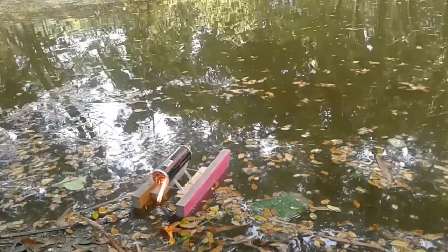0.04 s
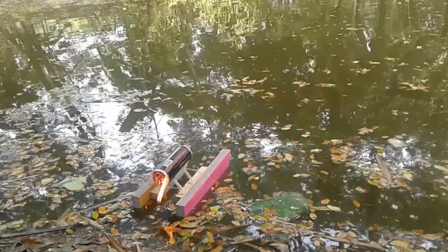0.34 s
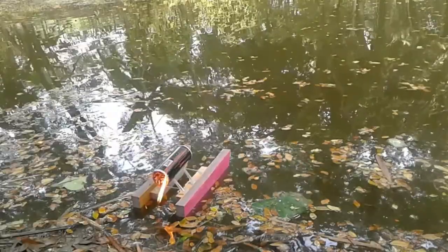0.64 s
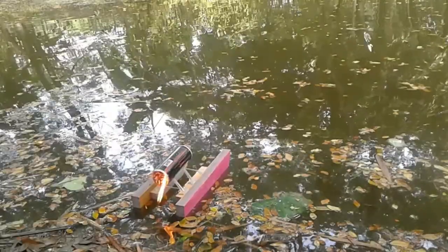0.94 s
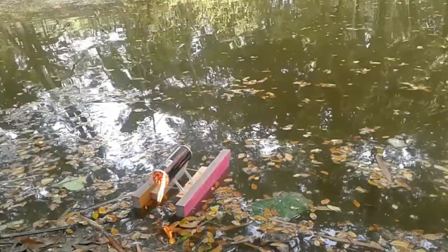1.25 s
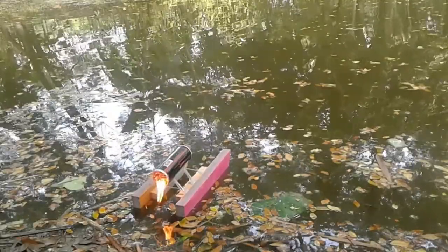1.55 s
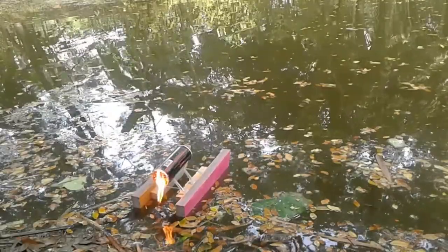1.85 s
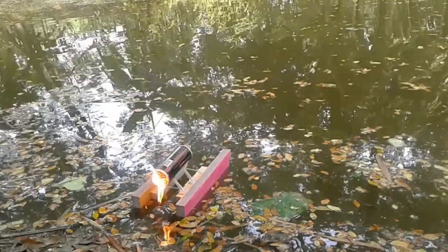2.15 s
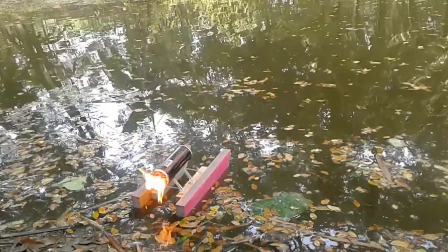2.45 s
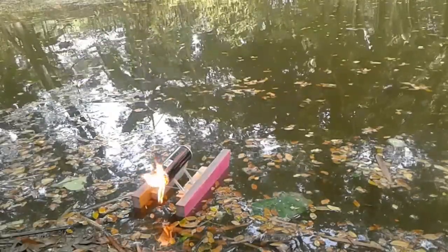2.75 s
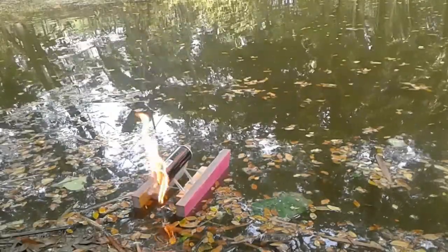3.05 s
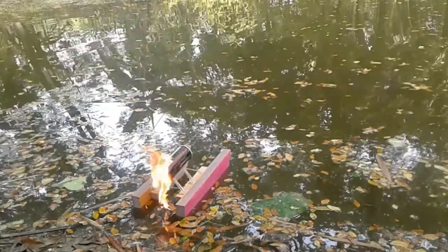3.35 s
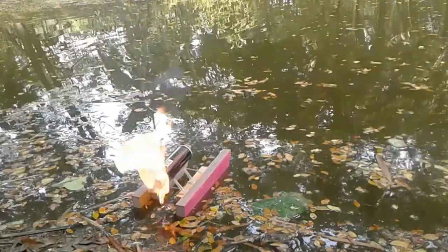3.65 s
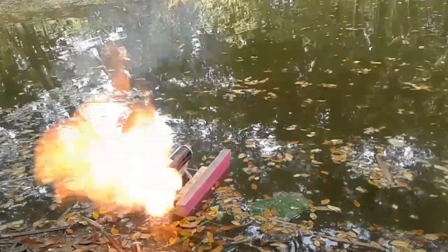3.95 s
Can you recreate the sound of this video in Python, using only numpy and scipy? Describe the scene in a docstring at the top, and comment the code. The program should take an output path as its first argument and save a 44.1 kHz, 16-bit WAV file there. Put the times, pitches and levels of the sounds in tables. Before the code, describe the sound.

Matches burning in a metal tube pop and hiss, then flare into a roaring jet.

```python
"""Beside a pond, with the microphone facing a metal tube in which match heads burn. The flame flutters,
spits and pops; gas rushes from the mouth in surges, hisses harder and at last flares into a roaring jet.
A small piece of metal clinks at first. Far off a bird whistles and trills in the trees, which echo it,
over a low murmur of open air. Everything sits in the middle, with only a slight stereo width."""
import sys
import numpy as np
from scipy import signal
from scipy.fft import rfft, irfft
from scipy.io import wavfile
from scipy.ndimage import uniform_filter1d

SR = 44100
rng = np.random.default_rng(int(sys.argv[2]) if len(sys.argv) > 2 else 0)


def log_audio(samples):
    """Write samples as a 16-bit WAV file to the path given in sys.argv[1]."""
    # one column per channel
    frames = np.atleast_2d(samples).T
    # limit to full scale, then quantise
    limited = np.clip(frames, -1, 1)
    pcm = np.round(limited * 32767).astype(np.int16)
    wavfile.write(sys.argv[1], SR, pcm)


N = 176400
TIME = np.arange(N) / SR

# gas at the tube's mouth: its surging rush, the flare's roar, the rumble below (time [s], level [dB])
RUSH_LEVEL = [(0, -70), (.2, -60), (.33, -77), (.44, -66.5), (.7, -65), (.78, -61.5), (1.1, -63.5),
              (1.3, -72), (1.35, -53), (1.55, -54.5), (1.72, -62.5), (2.02, -59.5), (2.06, -52),
              (2.35, -50.5), (2.6, -52), (2.84, -46), (3.05, -51), (3.25, -47.5), (3.4, -47.5),
              (3.55, -42.5), (3.75, -40), (4, -33)]
ROAR_LEVEL = [(0, -100), (3.0, -62), (3.18, -60), (3.23, -49), (3.38, -53), (3.5, -40), (3.6, -42),
              (3.72, -34), (3.83, -33), (4, -31.5)]
RUMBLE_LEVEL = [(0, -100), (3.3, -55), (3.6, -57), (3.8, -47), (3.82, -29.5), (3.9, -36.5), (3.96, -29),
                (4, -37)]
# the colour of each (frequency [Hz], relative level [dB])
RUSH_SPECTRUM = [(40, -29), (150, -3.5), (400, 1), (1000, 1), (1500, -2), (2200, -24.5), (3400, -13),
                 (5000, -14), (7200, -23), (8500, -30), (11500, -25.5), (14000, -24.5), (16000, -24)]
ROAR_SPECTRUM = [(60, -20), (210, -7), (450, 4), (680, -2), (1100, 0), (1550, 0.5), (1860, -7),
                 (2120, -1.5), (2400, -4.5), (2780, 2.5), (3200, -6.5), (3700, -6.5), (4400, -19.5),
                 (7000, -14), (9500, -30), (13700, -19), (16000, -19)]
RUMBLE_SPECTRUM = [(20, -32), (45, -19), (80, -2.5), (120, 0), (205, 5), (330, -4.5), (600, -11.5),
                   (2000, -21), (16000, -80)]
def jet(rush_flutter_db, roar_flutter_db, rumble_flutter_db):
    """Turbulent gas leaves the tube: a fluttering rush, then the roar and rumble of the open flare."""
    rush = noise(RUSH_SPECTRUM) * undb(curve(RUSH_LEVEL) + rush_flutter_db * wander(rate_hz=64))
    eddies = wander(rate_hz=54)
    roar = noise(ROAR_SPECTRUM) * undb(curve(ROAR_LEVEL) + roar_flutter_db * eddies)
    rumble = noise(RUMBLE_SPECTRUM) * undb(curve(RUMBLE_LEVEL) + rumble_flutter_db * eddies)
    return rush + roar + rumble


# hiss of the jet (time [s], level [dB])
HISS_LEVEL = [(0, -77), (2.02, -77), (2.3, -60.5), (2.6, -55.5), (2.81, -47.5), (3.05, -54.5),
              (3.25, -50.5), (3.39, -48.5), (3.5, -42.5), (3.7, -43), (3.8, -44), (3.87, -39.5), (4, -55)]
# its resonances (frequency [Hz], relative level [dB]) and their drift (time [s], pitch [ratio])
HISS_SPECTRUM = [(1000, -8.5), (2300, -3), (2700, 1.5), (3150, -0.5), (3750, 5.5), (4400, 0.5), (5000, 0.5),
                 (6100, -15), (7000, 1), (7650, 0.5), (8550, -9), (9100, -5.5), (9750, -18), (11050, -9.5),
                 (11750, -14), (12900, -2.5), (13800, -11), (14500, -20), (16000, -17)]
HISS_DRIFT = [(2.2, 1.08), (2.8, 1.01), (3.3, 1), (3.72, .985), (3.8, .9), (3.87, .98)]
def hiss(flutter_db, patch_db=2, patch_hz=500, patch_s=.06):
    """Gas hisses in broad resonances that swell and fade in patches, and sink as the flame leaves."""
    hz, t, bins = signal.stft(rng.standard_normal(N), SR, nperseg=512)
    patches = uniform_filter1d(rng.standard_normal(bins.shape), size=int(patch_hz / hz[1]), axis=0)
    patches = unit(uniform_filter1d(patches, size=int(patch_s / t[1]), axis=1))
    gain = response(HISS_SPECTRUM, hz[:, None] / curve(HISS_DRIFT, t)) * undb(patch_db * patches)
    gas = signal.istft(bins * gain, SR)[1][:N]
    return unit(gas) * undb(curve(HISS_LEVEL) + flutter_db * wander(rate_hz=20.5))


# a hollow in the jet's treble as the flame shoots out (time [s], centre [Hz], depth [dB])
TREBLE_HOLLOW = [(3.45, 6100, 0), (3.68, 5800, 5), (3.76, 5400, 8), (3.815, 4350, 11), (3.87, 4900, 3),
                 (3.95, 4900, 8), (4, 4700, 6)]
def whoosh(gas, width_octaves=.14):
    """A sliding dip in the treble gives the flare its falling whoosh."""
    hz, t, bins = signal.stft(gas, SR, nperseg=512)
    off_centre = np.log2((hz[:, None] + 1) / curve(TREBLE_HOLLOW, t)) / width_octaves
    dip_db = curve(TREBLE_HOLLOW, t, column=2) * np.exp(-off_centre ** 2)
    return signal.istft(bins * undb(-dip_db), SR)[1][:N]


# pops in the tube (time [s], pitch [Hz], level [dB], rattle relative to the pop [dB])
GAS_POPS = [(.136, 1290, -39, -9.5), (0.2795, 1190, -24.5, -18), (0.2988, 900, -39, -25),
            (.641, 2580, -46, -9.5), (0.8794, 980, -25, -16.5), (0.94, 2630, -39.5, -9.5),
            (1.002, 1500, -48.5, -3.5), (1.109, 1690, -44.5, -4), (1.152, 1850, -43.5, -11),
            (1.361, 1220, -33.5, -12), (1.563, 910, -33, -23), (1.781, 2240, -41, -10),
            (1.8, 523.4, -41, -4), (1.933, 2570, -41.5, -14), (1.957, 1600, -46, -13),
            (2.889, 464, -29, -13)]
def pops(lead_s=.005):
    """The larger pockets of gas burst one by one."""
    out = np.zeros(N)
    for start, hz, db, rattle_db in GAS_POPS:
        add(out, start - lead_s, undb(db) * burst(hz, rattle_db, rng.standard_normal(SR // 12), lead_s))
    return out


def burst(hz, rattle_db, white, lead_s=.005, rattle_decay_s=.0079):
    """A pocket of gas bursts: a pressure swing with a slower body and a sharper edge, then a rattle."""
    t = TIME[:len(white)] - lead_s
    phase = np.pi * hz * t
    slow, fast = .35 * phase, 3.3 * phase
    swing = (1 - 2 * phase ** 2) * np.exp(-phase ** 2)
    body = undb(-15.5) * (1 - 2 * slow ** 2) * np.exp(-slow ** 2)
    edge = undb(-11) * 2 * fast * np.exp(-fast ** 2)
    band = signal.butter(1, [hz / 2, min(hz * 1.32, SR * .45)], "band", fs=SR)
    rattle = unit(signal.lfilter(*band, signal.lfilter(*band, white)))
    rattle *= (t > 0) * np.exp(-np.abs(t) / rattle_decay_s)
    return swing + body + edge + undb(rattle_db) * rattle


# match heads catching (time [s], length [s], level [dB], tilt [dB per octave])
MATCH_SPITS = [(0.191, 0.16, -58, -0.2), (0.344, 0.044, -52.5, 2.5), (0.733, 0.079, -58, 3),
               (0.833, 0.018, -54.5, -0.5), (1.052, .007, -60, 12), (1.187, .012, -62, 2),
               (1.32, 0.02, -53.5, -1.5), (1.88, 0.012, -49, -2.3), (2.035, 0.019, -51, -3),
               (3.422, 0.015, -45.5, 5), (3.919, 0.016, -35, 9.5), (3.962, .014, -41, 8)]
# their colour before the tilt (frequency [Hz], relative level [dB])
SPIT_SPECTRUM = [(200, 7), (1500, 11), (3000, 7), (5500, -5.5), (7200, 5.5), (9000, -12), (13000, -5.5),
                 (16000, -11)]
def spits(grain_db, attack_s=.009, release_s=.009):
    """Each match head catches with a short, grainy fizz, some dull and some bright."""
    out = np.zeros(N)
    for start, length, db, tilt in MATCH_SPITS:
        age = TIME - start
        envelope = np.clip(age / attack_s, 0, 1) * np.exp(-np.maximum(age - length, 0) / release_s)
        fizz = noise([(hz, level + tilt * np.log2(hz)) for hz, level in SPIT_SPECTRUM])
        out += undb(db) * envelope * fizz
    return out * undb(grain_db * wander(rate_hz=250))


# fine crackle of the flame (time [s], rate [bursts per second])
CRACKLE_DENSITY = [(0, 70), (.3, 165), (.5, 25), (.75, 80.5), (1.1, 179), (1.4, 50), (1.7, 28), (1.9, 69),
                   (2.2, 30.8), (4, 67)]
def crackle(level_db=-52.5, spread_db=1, centre_hz=1800, spread_octaves=.68):
    """Many tiny bursts at random moments, each of its own pitch and size."""
    out = np.zeros(N)
    expected_count = np.cumsum(curve(CRACKLE_DENSITY)) / SR
    draws = rng.standard_normal(size=(600, 2000))
    thresholds = np.cumsum(rng.exponential(size=len(draws)))
    for threshold, white in zip(thresholds[thresholds < expected_count[-1]], draws):
        start = np.interp(threshold, expected_count, TIME)
        hz = min(centre_hz * 2 ** (spread_octaves * white[0]), 3600)
        db = level_db + spread_db * min(white[1], 2)
        add(out, start, undb(db) * burst(hz, rattle_db=-8.5, white=white))
    return out


# touches of a small piece of metal (time [s], level [dB])
METAL_TOUCHES = [(.049, -46.5), (0.151, -45.5), (0.168, -48), (.222, -41.5), (.24, -42), (.317, -46.5),
                 (.466, -53), (.528, -44.5), (0.682, -42.5), (.723, -50), (0.782, -43.5)]
# its modes (frequency [Hz], relative level [dB], time to fall 60 dB [s])
METAL_MODES = [(3917, 1, 0.058), (3980, -17.5, .25), (10060, -33, 0.14), (14100, -33, .2)]
def clinks(attack_s=.001, bounce_s=.0063):
    """A small piece of metal touches, bounces once and rings out into the trees."""
    out, t = np.zeros(N), TIME[:SR // 2]
    for start, db in METAL_TOUCHES:
        *phases, bounce = rng.random(len(METAL_MODES) + 1)
        ring = sum(undb(level - 60 * t / t60) * np.sin(2 * np.pi * (hz * t + phase))
                   for (hz, level, t60), phase in zip(METAL_MODES, phases))
        ring *= undb(db) * np.minimum(t / attack_s, 1)
        add(out, start, ring)
        add(out, start + bounce_s * (.5 + bounce), ring)
    return trees(out, t60_s=.44, direct_db=0, tail_db=-7)


# arched whistles, far off in the trees (time [s], top pitch [Hz], level [dB])
BIRD_WHISTLES = [(.9, 6050, -48.5), (1.416, 6220, -45.5), (2.638, 6250, -43)]
# the shape of each (position [share of length], pitch [ratio], relative level [dB])
WHISTLE_ARCH = [(0, .92, -12), (.17, .985, -7), (.42, 1, -6), (.55, .945, -8), (.7, .78, -7.5),
                (1, .68, -7.5)]
# onsets of the trill's upward flicks (time [s])
FLICK_TIMES = [2.222, 2.255, 2.294, 2.33, 2.364, 2.396, 2.427, 2.464, 2.486, 2.522, 2.556]
# how the flicks narrow along the trill, and one longer rising note near its end
# (time [s], length [s], start pitch [Hz], end pitch [Hz], level [dB])
FLICK_SHAPES = [(2.222, .016, 5340, 6900, -54), (2.28, 0.023, 5117, 7040, -52),
                (2.4, 0.017, 5860, 6270, -51.5), (2.556, 0.017, 5840, 6200, -56.5)]
RISING_NOTE = (2.5, .058, 4996, 5330, -53)
def bird(waver=.008, fall_waver=.13, echo_s=.062, echo_db=-5.5):
    """A far bird trills and whistles, buzzy as the pitch falls. Trees blur it; the far bank echoes it."""
    song = np.zeros(N)
    whistle_s = .11
    share = np.linspace(0, 1, int(whistle_s * SR))
    buzz = waver + fall_waver * (1 - curve(WHISTLE_ARCH, share))
    for start, hz, db in BIRD_WHISTLES:
        whistle = note(whistle_s, [(position, hz * ratio) for position, ratio, _ in WHISTLE_ARCH], buzz)
        add(song, start, whistle * undb(db + curve(WHISTLE_ARCH, share, column=2)))
    flicks = [(start, *(curve(FLICK_SHAPES, start, k) for k in range(1, 5))) for start in FLICK_TIMES]
    for start, length, from_hz, to_hz, db in [RISING_NOTE, *flicks]:
        add(song, start, undb(db) * note(length, [(0, from_hz), (1, to_hz)], waver))
    echo = undb(echo_db) * np.interp(TIME - echo_s, TIME, song, left=0)
    return trees(song + echo, t60_s=.56, direct_db=-4, tail_db=.5)


def note(length_s, pitch, waver):
    """A wavering bird note with soft ends that follows (position [share of length], pitch [Hz])."""
    share = np.linspace(0, 1, int(length_s * SR))
    jitter = unit(uniform_filter1d(rng.standard_normal(SR), size=60))[:len(share)]
    hz = curve(pitch, share) * (1 + waver * jitter)
    return np.sin(2 * np.pi * np.cumsum(hz) / SR) * signal.windows.tukey(len(share), .5)


def trees(x, t60_s, direct_db, tail_db, build_s=.0047):
    """Trunks scatter a sound into a tail on its way to the microphone."""
    t = TIME[:SR]
    tail = rng.standard_normal(SR) * undb(-60 * t / t60_s) * (1 - np.exp(-t / build_s))
    scattered = signal.fftconvolve(x, unit(tail) / np.sqrt(SR))[:N]
    return undb(direct_db) * x + undb(tail_db) * scattered


# open air around the pond (frequency [Hz], relative level [dB])
AIR_SPECTRUM = [(20, -15), (40, -18), (80, -4.5), (160, 1.5), (260, -6.5), (600, -13), (1500, -23.5),
                (3000, -27), (5000, -42), (6300, -38), (7100, -23), (8400, -50), (12000, -37.5),
                (16000, -42)]
def air(level_db, flutter_db):
    """Low outdoor murmur of the air, wavering, with a faint high band."""
    return noise(AIR_SPECTRUM) * undb(level_db + flutter_db * wander(rate_hz=17))


def stereo_width(x, level_db, decay_s=.18):
    """A faint diffuse tail, opposite in left and right, adds slight width."""
    tail = unit(rng.standard_normal(SR) * np.exp(-TIME[:SR] / decay_s)) / np.sqrt(SR)
    return undb(level_db) * signal.fftconvolve(x, tail)[:N]


def undb(db):
    """Decibels to gain."""
    return 10 ** (np.asarray(db) / 20)


def unit(x):
    """Scale to rms 1."""
    return x / np.sqrt(np.mean(x ** 2) + 1e-20)


def curve(rows, t=TIME, column=1):
    """One column of a table, joined by straight lines."""
    rows = np.array(rows, float)
    return np.interp(t, rows[:, 0], rows[:, column])


def response(spectrum, hz):
    """Gain of a spectrum at the given frequencies."""
    points = np.array(spectrum, float)
    return undb(np.interp(np.log(hz + 1), np.log(points[:, 0]), points[:, 1]))


def noise(spectrum):
    """Coloured noise of rms 1."""
    gain = response(spectrum, np.fft.rfftfreq(N, 1 / SR))
    return unit(irfft(rfft(rng.standard_normal(N)) * gain, N))


def wander(rate_hz):
    """Smooth random motion of rms 1, mostly slower than rate_hz."""
    rolloff = 1 + (np.fft.rfftfreq(N, 1 / SR) / rate_hz) ** 4
    return unit(irfft(rfft(rng.standard_normal(N)) / rolloff, N))


def add(out, start, x):
    """Mix a sound in at a time."""
    i = int(np.clip(start * SR, 0, N - 1))
    out[i:i + len(x)] += x[:N - i]


def scene():
    """Every source is heard from the middle; a faint diffuse tail adds slight width."""
    gas = jet(rush_flutter_db=.43, roar_flutter_db=.2, rumble_flutter_db=2) + hiss(flutter_db=1.13)
    fire = whoosh(gas) + crackle() + spits(grain_db=2.5) + pops()
    mid = fire + clinks() + bird() + air(level_db=-54.5, flutter_db=1.7)
    side = stereo_width(mid, level_db=-31.5)
    return np.array([mid + side, mid - side])


def record(dry):
    """The recorder cuts the top steeply."""
    top_hz = 15550
    return signal.sosfilt(signal.ellip(10, .2, 70, top_hz, fs=SR, output="sos"), dry)


dry = scene()
out = record(dry)
log_audio(out)
```